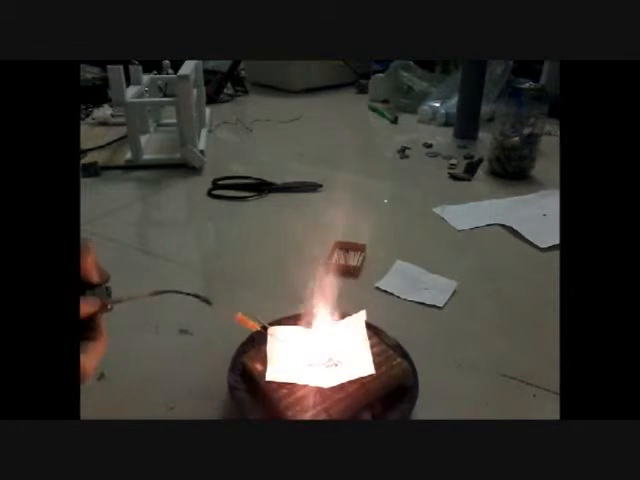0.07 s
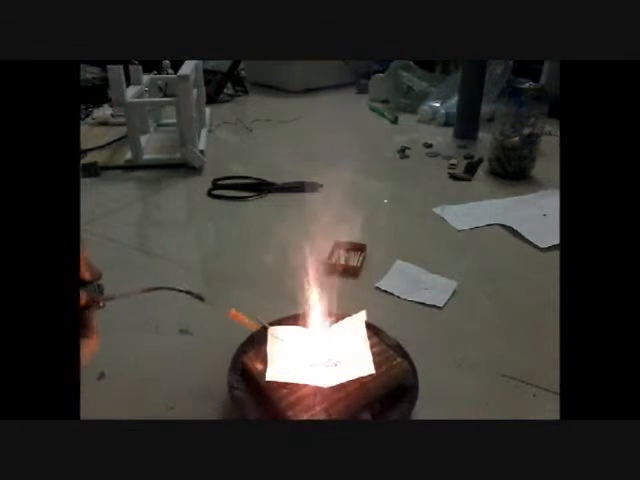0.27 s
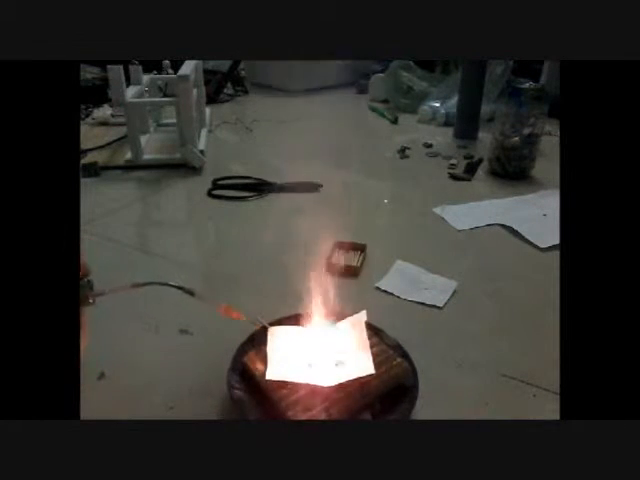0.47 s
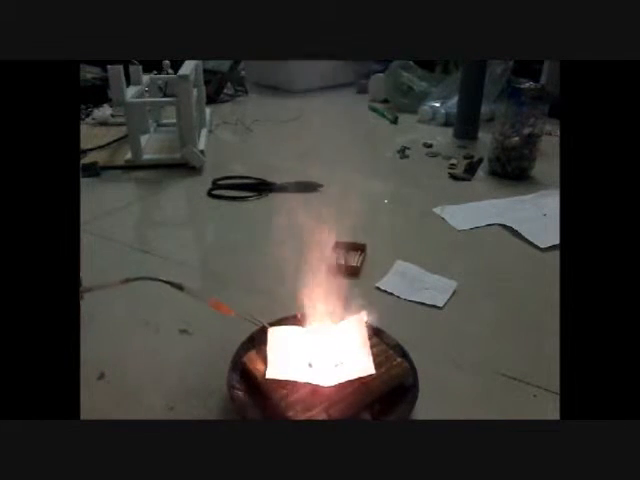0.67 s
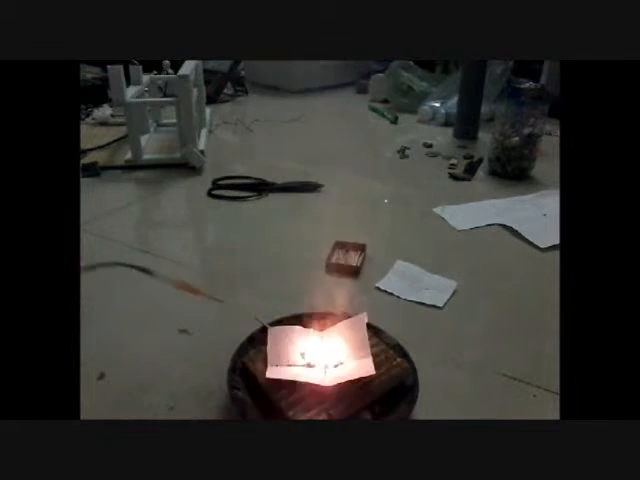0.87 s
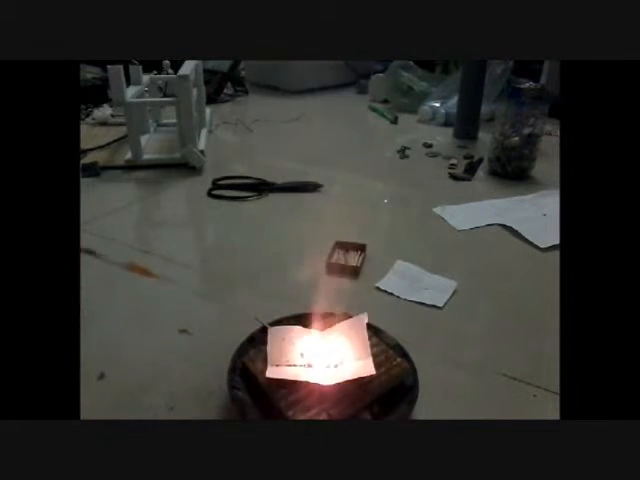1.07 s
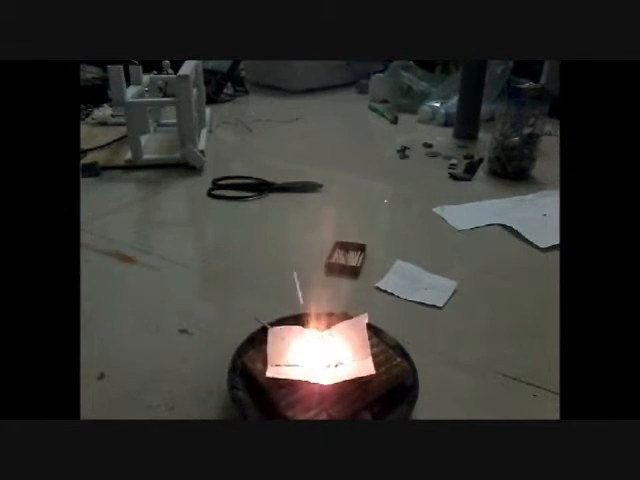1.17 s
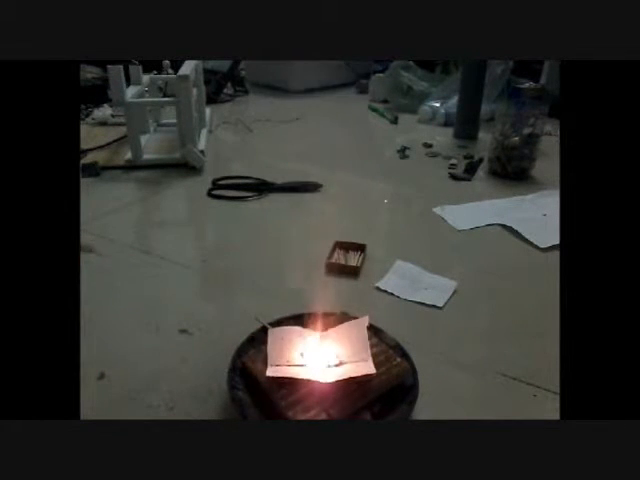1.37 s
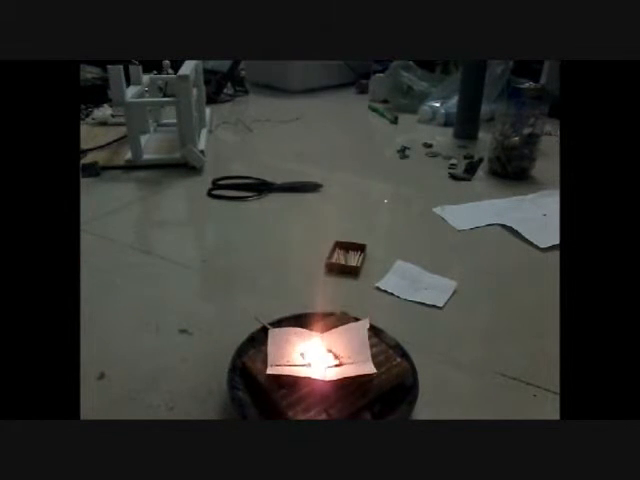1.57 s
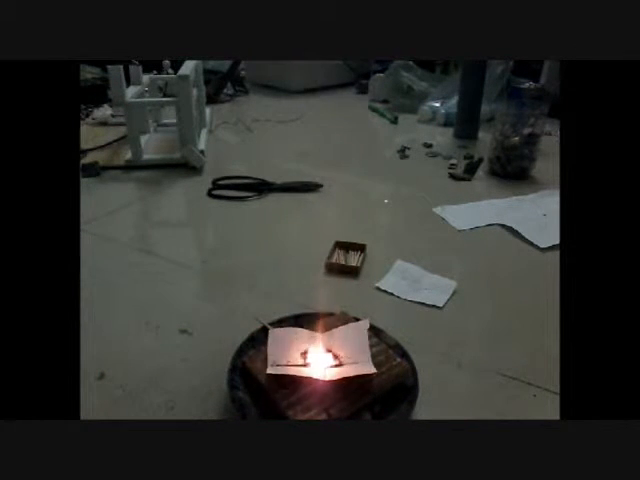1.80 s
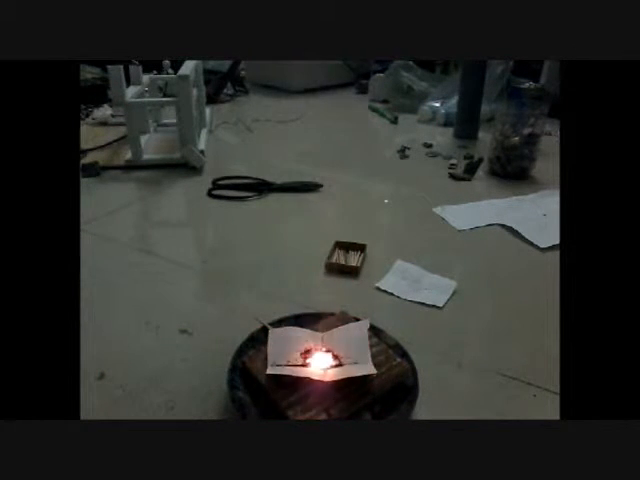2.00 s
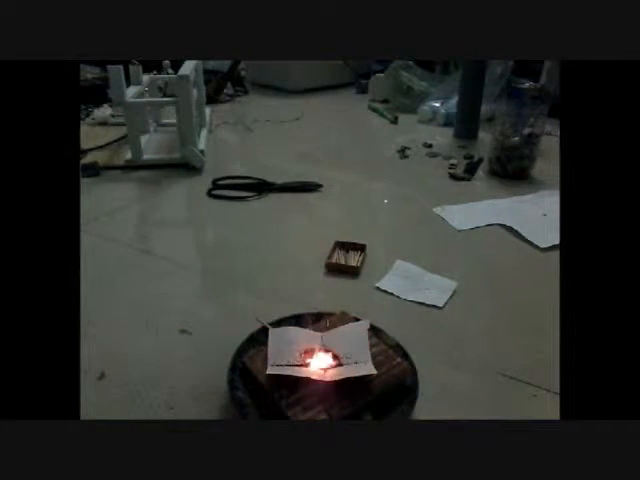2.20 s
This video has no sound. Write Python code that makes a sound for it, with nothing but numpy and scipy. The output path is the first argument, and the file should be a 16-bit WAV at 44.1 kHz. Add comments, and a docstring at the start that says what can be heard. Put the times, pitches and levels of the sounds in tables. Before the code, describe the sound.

A small heap of powder burning on paper hisses and crackles with bright snaps, pulses into a brief loud rasp, then drops to sparse ticks, in a lightly ringing room through a small, sharp-sounding microphone.

```python
"""Countless tiny pops make a hiss, with louder snaps, dull puffs and a soft flutter. Then the burning
pulses, races up into a loud rasp and stops, leaving embers that tick: a small heap of powder burns
on paper on a workroom floor. Pops are single clicks given a tone; flame and puffs are filtered noise.
The room rings briefly around the pops, and a small microphone sharpens every one of them."""
import sys
import numpy as np
from scipy import signal
from scipy.fft import rfft, irfft
from scipy.io import wavfile
from scipy.ndimage import uniform_filter1d, minimum_filter1d

SR = 44100
rng = np.random.default_rng(int(sys.argv[2]) if len(sys.argv) > 2 else 0)


def store_wav(level_fs):
    """Save 16-bit WAV to argv[1]."""
    pcm = np.round(np.clip(np.atleast_2d(level_fs), -1, 1) * 32767)
    wavfile.write(sys.argv[1], SR, pcm.T.astype(np.int16))


N = 98872
TIME = np.arange(N) / SR  # seconds

# Loudness of the fizz before its tone is set. Each row: time in seconds, level in dB.
FIZZ_LEVEL = [(0, -39.5), (.1, -36), (.24, -28.5), (.31, -31), (.39, -26.5), (.47, -28.5), (.54, -30),
              (.70, -26), (.84, -26.5), (1.0, -33), (1.07, -33.5), (1.21, -35), (1.29, -33.5),
              (1.40, -31.5), (1.56, -37), (1.78, -28.5), (1.88, -39.5), (2.05, -44), (2.14, -39.5),
              (2.24, -46.5)]
# Tone of the thin, tiny pops. Each row: frequency in Hz, gain in dB.
FIZZ_TONE = [(200, 13), (1200, -1), (2600, -0.5), (4200, -1.5), (6200, -0.5), (8500, -2), (11500, -1.5),
             (14000, -23)]
FIZZ_POPS_PER_S, FIZZ_FLICKER_DB, FIZZ_FLICKER_HZ = 5200, 0.37, 56
FIZZ_SPREAD_DB, FIZZ_RANGE_DB = 6, 19  # average rise above the weakest pop, and the most allowed

# Single grains that burst loudly. Each row: time in seconds, click level in dB before the trim.
SNAPS = [(0.3924, -15), (0.44, -23), (0.6983, -10), (0.7728, -15), (0.8282, -8), (0.8533, -5),
         (0.8748, -7.5), (0.913, -14), (0.9294, -4), (0.933, -4), (0.9799, -4.5), (1.013, -11.5),
         (1.0898, -8), (1.1298, -13), (1.2612, -7.5), (1.2731, -13), (1.3007, -13), (1.3704, -13.5),
         (1.554, -18), (1.587, -11.5), (1.6139, -4), (1.9541, -17), (1.9756, -20.5), (2.0323, -21),
         (2.0713, -20.5), (2.1256, -16.5), (2.1418, -23), (2.1511, -23), (2.166, -21.5), (2.2247, -26.5)]
SNAP_TRIM_DB = 0.15

# Spells of pulsed burning, one list each. Each row: time in seconds, pops per second,
# typical click level in dB before the tone is set.
SPUTTER_SPELLS = [
    [(1.464, 365, -19), (1.508, 305, -12.5), (1.536, 450, -23)],
    [(1.569, 230, -17), (1.577, 290, -14), (1.587, 330, -12.5)],
    [(1.599, 130, -18), (1.616, 200, -6), (1.660, 300, -2.5), (1.690, 370, -3.5), (1.702, 420, -3.5),
     (1.728, 600, -3), (1.748, 740, -7.5), (1.752, 700, -17), (1.795, 650, -17)],
]
# Tone of these pulses, strongest from the middle up to about 6 kHz.
# Each row: frequency in Hz, gain in dB.
SPUTTER_TONE = [(100, -24), (420, -26), (600, 2.5), (1200, 0), (2300, 0.5), (4500, 2.5), (6200, -0.5),
                (8500, -4.5), (10500, -14), (12500, -32), (15000, -39)]
SPUTTER_JITTER, SPUTTER_SPREAD_DB = 0.16, 2.0  # unevenness of the gaps (a fraction) and of the levels

# Short puffs of gas. Each row: time in seconds, level in dB, centre frequency in Hz.
PUFFS = [(0.417, -46.5, 230), (.499, -42.5, 367), (1.453, -42, 610)]
PUFF_WIDTH_S, PUFF_WIDTH_OCTAVES = 0.0081, 0.96  # widths of the bell curves in time and pitch

# Loudness of the flame's low flutter. Each row: time in seconds, level in dB.
FLAME_LEVEL = [(0, -72), (.15, -61), (.25, -55), (.36, -55), (.44, -49.5), (.53, -46), (.66, -53.5),
               (.78, -48.5), (.98, -45.5), (1.1, -51), (1.22, -48.5), (1.29, -40.5), (1.35, -49),
               (1.48, -46.5), (1.56, -59), (1.625, -42), (1.69, -67), (1.79, -55), (1.88, -51.5),
               (2.0, -61.5), (2.12, -59.5), (2.24, -62)]
# Tone of the flame. Each row: frequency in Hz, gain in dB.
FLAME_TONE = [(30, -17), (120, -4), (240, 0.5), (380, -5.5), (580, 2.5), (900, -3.5), (1150, -8),
              (1450, -0.5), (1800, -12), (3000, -1), (8000, -31)]
FLUTTER_DB, FLUTTER_HZ = 1.5, 44.6

# Tone of the room's steady background. Each row: frequency in Hz, relative level in dB.
AMBIENCE_TONE = [(20, -18), (40, -15), (70, -4), (105, 1.5), (150, -1.5), (200, -10), (400, -17),
                 (1000, -17), (3000, -26.5), (6000, -22), (10000, -20), (15000, -35)]
AMBIENCE_DB = -54.5

# Echoes from the floor and nearby things. Each row: delay in seconds, level in dB.
ECHOES = [(.0022, -11), (.0036, -15), (.0079, -26.5)]
# How long the room rings. Each row: frequency in Hz, time to fall by 60 dB in seconds.
ROOM_T60 = [(200, 0.14), (2000, 0.46), (6000, 0.36), (12000, 0.41)]
# Tone of the ringing. Each row: frequency in Hz, gain in dB.
ROOM_TONE = [(200, 0.5), (2500, 4.5), (4500, 1), (6200, -2), (12000, 5.5)]
ROOM_DB, ROOM_DELAY_S = -4.5, 0.004

# How the microphone colours a sharp pop, with its treble resonance.
# Each row: frequency in Hz, relative gain in dB.
MICROPHONE_TONE = [(60, -41), (300, -33.5), (700, -29), (1150, -30), (1500, -28), (2200, -24.5),
                   (3100, -23), (3600, -14.5), (4050, -14.5), (4650, -16.5), (5200, -9), (5650, -2),
                   (6200, 2.5), (6800, -6), (7800, -10.5), (8900, -22), (10000, -27.5), (11800, -27),
                   (12800, -37), (15000, -43)]
CEILING, CUTOFF_HZ = 0.97, 15200  # limiter ceiling (full scale is 1) and top of the treble


def amp(db):
    """Turns decibels into a plain gain."""
    return 10 ** (np.asarray(db) / 20)


def unit(x):
    """Scales a sound to an average (rms) strength of one."""
    return x / np.sqrt(np.mean(x ** 2) + 1e-20)


def level(points):
    """Joins points of time and dB into a gain for every sample."""
    return amp(np.interp(TIME, *np.transpose(points)))


def at_hz(points, hz):
    """Reads a table between its rows, with frequency on a logarithmic scale as in pitch."""
    table_hz, value = np.transpose(points)
    return np.interp(np.log(hz + 1), np.log(table_hz + 1), value)


def tint(x, tone):
    """Makes each frequency stronger or weaker by a tone table."""
    size = 2 * len(x)  # spare room, so that the end does not wrap onto the start
    gain = amp(at_hz(tone, np.fft.rfftfreq(size, 1 / SR)))
    return irfft(rfft(x, size) * gain)[:len(x)]


def drift(hz):
    """Random wavering, mostly between a tenth of the given rate and that rate."""
    f = np.fft.rfftfreq(N, 1 / SR)
    keep = (f > hz / 10) / (1 + (f / hz) ** 4)
    return unit(irfft(rfft(rng.standard_normal(N)) * keep, N))


def fizz():
    """Grains pop at random moments, most weak and a few strong, and blend into a hiss."""
    lit = rng.random(N) < FIZZ_POPS_PER_S / SR
    size_db = np.minimum(FIZZ_SPREAD_DB * rng.exponential(1, N), FIZZ_RANGE_DB)
    flicker_db = FIZZ_FLICKER_DB * drift(FIZZ_FLICKER_HZ)
    clicks = unit(lit * amp(size_db + flicker_db))
    return tint(clicks * level(FIZZ_LEVEL), FIZZ_TONE)


def snaps():
    """Each bursting grain gives one sharp click, a single sample long."""
    out = np.zeros(N)
    for s, db in SNAPS:
        out[round(s * SR)] += amp(db + SNAP_TRIM_DB)
    return out


def sputter(spell):
    """Pulsed burning sends out a slightly uneven train of pops at a changing rate."""
    times, rates, dbs = np.transpose(spell)
    out, s = np.zeros(N), times[0]
    for gap, size in rng.standard_normal((200, 2)):
        if s > times[-1]:
            break
        pop_db = np.interp(s, times, dbs) + SPUTTER_SPREAD_DB * size
        out[round(s * SR)] = amp(pop_db)
        s += np.exp(SPUTTER_JITTER * gap) / np.interp(s, times, rates)
    return tint(out, SPUTTER_TONE)


def puff(s, db, hz):
    """Gas pushes briefly out of the heap: noise around one pitch that swells and fades."""
    octaves = np.log2((np.fft.rfftfreq(N, 1 / SR) + 1) / hz)
    band = np.exp(-.5 * (octaves / PUFF_WIDTH_OCTAVES) ** 2)
    gas = unit(irfft(rfft(rng.standard_normal(N)) * band, N))
    swell = np.exp(-.5 * ((TIME - s) / PUFF_WIDTH_S) ** 2)
    return amp(db) * gas * swell


def flame():
    """The turbulent jet of hot gas makes low noise with a fluttering strength."""
    flutter = amp(FLUTTER_DB * drift(FLUTTER_HZ))
    noise = tint(rng.standard_normal(N) * flutter, FLAME_TONE)
    return unit(noise) * level(FLAME_LEVEL)


def ambience():
    """The room's steady background is noise with a fixed tone."""
    return amp(AMBIENCE_DB) * unit(tint(rng.standard_normal(N), AMBIENCE_TONE))


def room(x):
    """Sound arrives directly, then as near echoes, then as a scattered, fading tail."""
    hz, t, noise = signal.stft(rng.standard_normal(SR // 2), SR, nperseg=256)
    fade = amp(-60 * t / at_hz(ROOM_T60, hz)[:, None])  # each frequency dies at its own speed
    tail = signal.istft(noise * fade, SR)[1]
    tail = tint(tail / np.linalg.norm(tail), ROOM_TONE)
    response = np.concatenate([np.zeros(round(ROOM_DELAY_S * SR)), amp(ROOM_DB) * tail])
    response[0] += 1  # the direct sound
    for s, db in ECHOES:
        response[round(s * SR)] += amp(db)
    return signal.fftconvolve(x, response)[:N]


def microphone_ring(size=4096):
    """One click makes the microphone ring, never before the click; the peak is one."""
    log_gain = np.log(amp(at_hz(MICROPHONE_TONE, abs(np.fft.fftfreq(size, 1 / SR)))))
    # minimum phase: this timing of the frequencies lets the ring start at once
    spectrum = np.exp(np.conj(signal.hilbert(log_gain)))
    ring = np.fft.ifft(spectrum).real[:size // 2]
    return ring / abs(ring).max()


def scene():
    """Pops pass through the room and microphone; flame, puffs and background are added."""
    ring = microphone_ring()
    fizz_pops = fizz() / np.linalg.norm(ring)  # makes up for the strength of the ring
    pops = fizz_pops + snaps() + sum(sputter(spell) for spell in SPUTTER_SPELLS)
    rumble_cut = signal.butter(2, 120, "high", fs=SR, output="sos")
    pops = signal.sosfilt(rumble_cut, pops)
    heard_pops = signal.fftconvolve(room(pops), ring)[:N]
    gas_puffs = sum(puff(*row) for row in PUFFS)
    return (heard_pops + gas_puffs + flame() + ambience())[None]


def record(dry):
    """A quick limiter turns down the strongest peaks, then a filter removes the top treble."""
    gain = minimum_filter1d(CEILING / np.maximum(abs(dry), CEILING), size=65, axis=1)
    limited = dry * uniform_filter1d(gain, size=65, axis=1)  # 65 samples are about 1.5 ms
    low_pass = signal.firwin(255, CUTOFF_HZ, window=("kaiser", 9), fs=SR)
    return signal.oaconvolve(limited, low_pass[None], "same")


dry = scene()
out = record(dry)
store_wav(out)
```